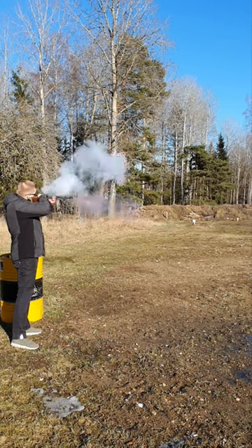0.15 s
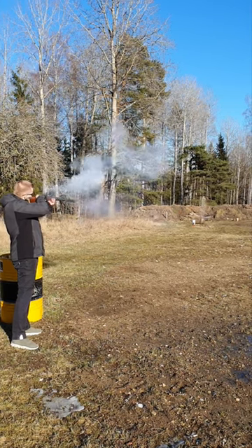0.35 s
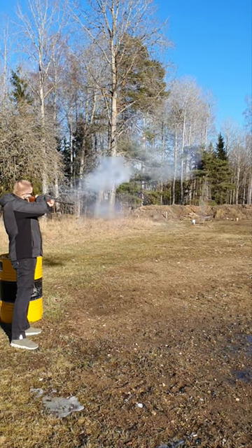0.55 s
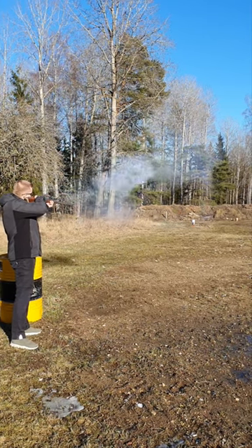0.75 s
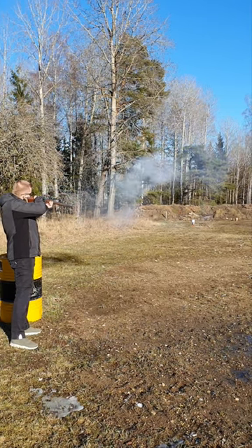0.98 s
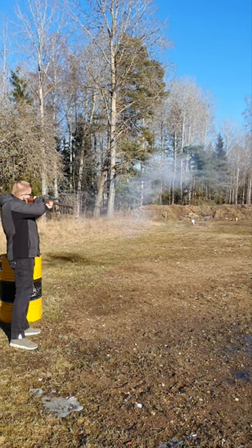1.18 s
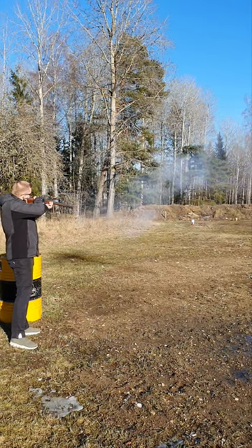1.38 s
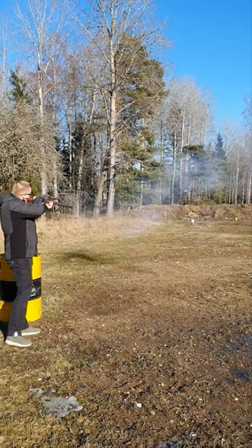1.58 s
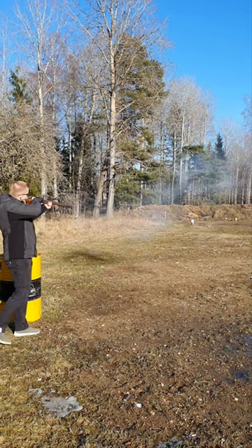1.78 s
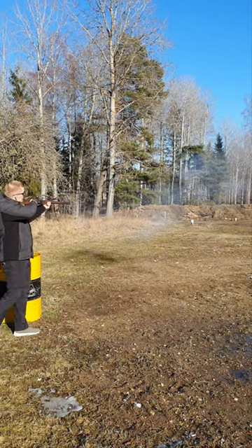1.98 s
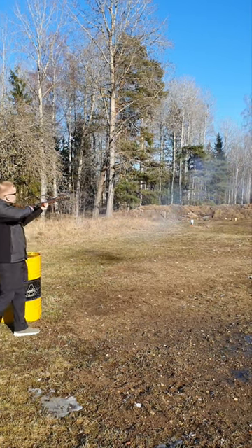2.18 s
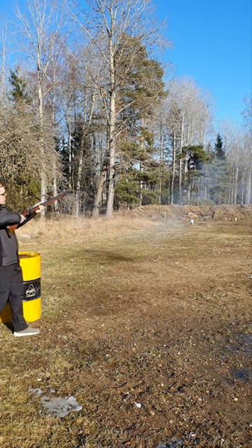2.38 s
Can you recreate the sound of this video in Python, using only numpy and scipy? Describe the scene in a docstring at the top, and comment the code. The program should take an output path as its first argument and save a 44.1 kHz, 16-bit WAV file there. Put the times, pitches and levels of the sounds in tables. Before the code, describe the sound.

A single loud rifle shot cracks across an open field, its echo rolling off nearby trees

```python
"""Flintlock rifle in an open field

A phone with two microphone ports stands a few metres from the rifle. Priming powder sputters in the pan as
coloured crackle; the muzzle blast is a burst of shaped noise over decaying low sines. Sharp slaps from nearby
ground and banks are damped pressure jumps, and the forest scatters a dulling tail of dense, filtered clicks.
A lone click and faint metal ticks follow. Wind buffets the ports as low noise, puffs and short whistles;
a faint hiss lies under all."""
import sys
import numpy as np
from scipy import signal
from scipy.fft import rfft, irfft
from scipy.io import wavfile
from scipy.ndimage import uniform_filter1d

SR = 44100
rng = np.random.default_rng(int(sys.argv[2]) if len(sys.argv) > 2 else 0)


def output_pcm(signal):
    """Save a mono or channel-first signal as 16-bit PCM at the path in sys.argv[1].

    Samples are clipped to [-1, 1] before scaling.
    """
    pcm = np.clip(np.atleast_2d(signal).T, -1, 1) * 32767
    wavfile.write(sys.argv[1], SR, np.round(pcm).astype(np.int16))


def convert_level_to_amplitude(level_db):
    """Map a level in decibels to its linear amplitude factor."""
    exponent = np.asarray(level_db, float) / 20
    return 10 ** exponent


N = 108045  # samples, 2.45 s


def on_time(rows):
    """Curve of (s, value) rows per sample."""
    a = np.array(rows, float)
    return np.interp(np.arange(N) / SR, a[:, 0], a[:, 1])


def on_hz(rows, hz):
    """Table of (Hz, value) rows read on a log frequency axis."""
    a = np.array(rows, float)
    return np.interp(np.log(np.maximum(hz, 1)), np.log(a[:, 0]), a[:, 1])


def unit(x):
    """Scale to rms 1."""
    return x / np.sqrt(np.mean(x ** 2))


def coloured(x, colour):
    """Filter x by a colour table, then scale to rms 1."""
    hz = np.arange(N // 2 + 1) * SR / N
    return unit(irfft(rfft(x) * convert_level_to_amplitude(on_hz(colour, hz)), N))


def walk(rate):
    """Slow random wander with about rate new values per second, spread 1."""
    hold = int(SR / rate)
    steps = np.repeat(rng.standard_normal(N // hold + 1), hold)
    w = uniform_filter1d(steps, hold)[:N]
    return w / w.std()


def band(x, hz, width_hz):
    """Two-pole resonance."""
    return signal.lfilter(*signal.iirpeak(hz, hz / width_hz, fs=SR), x)


def add(out, x, at_s):
    """Mix x into out from at_s."""
    i = int(at_s * SR)
    n = min(x.shape[-1], N - i)
    out[..., i:i + n] += x[..., :n]


def crackle(per_s, spread_db):
    """Random clicks of either sign and uneven size, per_s of them a second on average."""
    chance, side, size = rng.random((3, N))
    heights = convert_level_to_amplitude(-spread_db * np.log(size + 1e-9))
    return (chance < per_s / SR) * np.sign(side - .5) * heights


# How alike the two ports hear a sound: f/Hz, likeness (0-1)
PORT_LIKENESS = [(60, 1), (300, 1), (700, .9), (1400, 0.25), (3000, 0.26), (6000, 0.61), (15000, 0.61)]
# Left port against right: f/Hz, level difference/dB
PORT_BALANCE = [(60, 1.5), (110, -2), (200, 2), (380, -1), (700, -1), (1290, -2), (2380, -2), (4400, -6),
                (8120, -3.5), (15000, -1.5)]
# Phase by which the left port leads the right: f/Hz, lead/rad
PORT_LEAD = [(60, 0.7), (300, 0.8), (700, -1.48), (1400, 0.76), (4000, -0.94), (8000, -2), (15000, -1)]


def ports(common, apart):
    """Two ports hear the same sound with a lead and a balance, plus an unrelated share."""
    hz = np.arange(N // 2 + 1) * SR / N
    like = np.clip(on_hz(PORT_LIKENESS, hz), 0, 1)
    half = convert_level_to_amplitude(on_hz(PORT_BALANCE, hz) / 2) * np.exp(.5j * on_hz(PORT_LEAD, hz))
    shared = np.sqrt((1 + like) / 2) * rfft(common)
    unshared = np.sqrt((1 - like) / 2) * rfft(apart)
    return irfft(np.array([(shared + unshared) * half, (shared - unshared) / half]), N)


# Muzzle gas roar ahead of the ports: t/s, level/dB
ROAR_LEVEL = [(.199, -72.5), (.203, -35), (.2065, -26), (.2085, -9.5), (.2105, -13.5), (.2115, -20),
              (.2135, -20.5), (.217, -21.5), (.224, -24.5), (.24, -33), (.27, -36.5), (.30, -55.5)]
# Spectrum of the roar: f/Hz, relative level per Hz/dB
ROAR_SPECTRUM = [(180, -29), (300, 4.5), (1280, -23.5), (2030, -11.5), (3640, -13.5), (4160, -13.5),
                 (6850, -23), (7690, -36), (8360, -15), (11100, -16.5), (16000, -37.5)]
# Thump of the blast: start t/s, f/Hz, level/dB, t60/s, first swing (+1 push, -1 pull)
THUMP_RINGS = [(0.2069, 77, -13, .11, -1), (0.21, 200, -9, .025, 1), (.2255, 310, -23, 0.064, 1),
               (.217, 130, -22, 0.053, -1)]


def blast():
    """Hot gas roars out of the muzzle as shaped noise over a low thump of decaying sines."""
    level = convert_level_to_amplitude(on_time([(.198, -120), *ROAR_LEVEL, (.33, -120)]))
    common, apart = [coloured(rng.standard_normal(N), ROAR_SPECTRUM) * level for _ in range(2)]
    out = ports(common, apart)
    t = np.arange(SR // 2) / SR
    left_right = convert_level_to_amplitude(np.array([[1.2], [-1.2]]))  # thump sits slightly left
    for at, hz, db, t60, sign in THUMP_RINGS:
        onset = 1 - np.exp(-t / .0015)
        ring = np.sign(sign) * np.sin(2 * np.pi * hz * t) * onset * 1000. ** (-t / t60)
        add(out, convert_level_to_amplitude(db) * ring * left_right, at)
    return out


# Slaps from single surfaces, ahead of the ports and their colour:
# t/s, peak level/dB, ring f/Hz, treble edge f/Hz, smear level against the peak/dB, bass level/dB
SURFACE_SLAPS = [(.2174, -3.5, 1200, 14000, -18, -39.5), (.220, -3.5, 1200, 8000, -16, -40.5),
                 (0.2575, -1, 1050, 14000, -15, -45.5), (.318, -20.5, 593, 3000, -3.5, -38),
                 (.329, -17.5, 685, 4000, -5, -31.5), (.357, -25.5, 906.4, 4006, -10, -40),
                 (.402, -22.5, 570, 5000, -3, -30.5), (.450, -24, 1300, 4006, -10.5, -49.5),
                 (.467, -33.5, 500.9, 1500, -2.5, -37.5), (.496, -18.5, 556, 995, -0.5, -54.5),
                 (.478, -29, 600.5, 1201, -2, -55), (0.514, -29, 550.8, 1202, 0.5, -54.5),
                 (.527, -21, 315, 900, -3, -26), (.588, -34, 1210, 4000, -12.5, -48.5),
                 (.601, -29.5, 390, 2970, -3, -37), (.665, -31.5, 665, 2500, -7.5, -55.5),
                 (.773, -40, 900, 2496, -2.5, -55.5), (1.47, -52.5, 600, 1200, 1, -69),
                 (1.755, -43, 550, 1100, -5, -57.5)]
SLAP_DAMPING = 2.5  # decay per ring cycle, in nepers
SCATTER_S, BASS_HZ, BASS_T60_S = .004, 105, .057
# Phone microphone colour on the slaps; the bump is a resonance added at this level
NOTCH_HZ, NOTCH_WIDTH_HZ = 7600, 2500
BUMP_HZ, BUMP_WIDTH_HZ, BUMP_DB = 10000, 2500, .5


def slaps():
    """Each surface sends back the pressure jump with its suction, a short smear and some of the thump."""
    out, t = np.zeros((2, N)), np.arange(SR // 8) / SR
    bass = np.sin(2 * np.pi * BASS_HZ * t) * 1000. ** (-t / BASS_T60_S)
    to_common = np.array([[1], [0]])
    for at, db, hz, top_hz, smear_db, bass_db in SURFACE_SLAPS:
        soft = signal.butter(3, min(top_hz, 19000), fs=SR, output="sos")
        jump = signal.sosfilt(soft, np.cos(2 * np.pi * hz * t) * np.exp(-SLAP_DAMPING * hz * t))
        jump = jump / jump.max()
        grit = rng.standard_normal((2, len(t))) * np.exp(-t / SCATTER_S)
        smear = signal.fftconvolve(grit, jump[None, :800])[:, :len(t)] / np.sqrt(np.sum(jump ** 2))
        direct = convert_level_to_amplitude(db) * jump + convert_level_to_amplitude(bass_db) * bass
        add(out, convert_level_to_amplitude(db + smear_db) * smear + direct * to_common, at)
    notch = band(out, NOTCH_HZ, NOTCH_WIDTH_HZ)
    out = out - notch
    out = out + convert_level_to_amplitude(BUMP_DB) * band(out + notch, BUMP_HZ, BUMP_WIDTH_HZ)
    return ports(*out)


# Forest tail around 600 Hz, ahead of the overall lift: t/s, level/dB
FOREST_LEVEL = [(.215, -53), (0.239, -35), (.29, -36.5), (.34, -39), (.385, -42.5), (.44, -46), (.5, -42),
                (.545, -44), (.575, -45), (.66, -47.5), (.78, -52), (.85, -56), (.95, -52), (1.12, -58),
                (1.321, -64.5), (1.5, -60.5), (1.83, -64), (1.97, -69.5), (2.45, -73.5)]
# Spectrum of the tail before its treble and path losses: f/Hz, relative level per Hz/dB
FOREST_SPECTRUM = [(24, -41.5), (40, -10.5), (297, -5.5), (542, -6.5), (615, -8.5), (680, -7),
                   (2260, -21.5), (3380, -23.5), (6020, -37.5), (9690, -27.5), (16000, -44)]
# Extra loss on the longer paths, negative for a gain: f/Hz, loss rate/(dB per s)
PATH_LOSS = [(60, 11.5), (200, 16), (600, -2.5), (1500, 2), (3000, 18), (5000, 28.5), (9000, 35),
             (15000, 53)]
# Treble of the tail against its middle: t/s, level/dB
TAIL_TREBLE = [(.22, 4), (.29, -0.5), (.38, 2.5), (.44, 3), (.49, -4.5), (.545, -2.5), (.58, 1.5), (.75, 3),
               (.85, 3), (1.1, 3), (1.3, 1.5), (1.5, -3.5), (2.45, -4.5)]
TREBLE_HZ = 1500  # the treble curve acts in full from here up
TRUNKS_PER_S, TRUNK_SPREAD_DB = 7000, 1.5
FOREST_FLICKER_DB, FOREST_LIFT_DB = 1.9, 5.5


def forest():
    """Echoes from countless trunks; later ones travelled further and lost more treble."""
    hz, t = np.arange(N // 2 + 1) * SR / N, np.arange(N) / SR
    echoes = [coloured(crackle(TRUNKS_PER_S, TRUNK_SPREAD_DB), FOREST_SPECTRUM) for _ in range(2)]
    spectrum, out = rfft(ports(*echoes)), 0
    half_octaves = 2 * np.log2(np.maximum(hz, 1) / 40)
    for k in range(19):  # overlapping half-octave bands from 40 Hz up
        share = np.cos(np.pi / 2 * np.clip(half_octaves - k, -1, 1)) ** 2
        mid_hz = 40 * 2 ** (k / 2)
        treble_db = min(mid_hz / TREBLE_HZ, 1) ** 2 * on_time(TAIL_TREBLE)
        loss_db = on_hz(PATH_LOSS, mid_hz) * (t - .3)
        db = treble_db - loss_db + FOREST_FLICKER_DB * walk(25)
        out = out + irfft(spectrum * share, N) * convert_level_to_amplitude(db)
    return out * convert_level_to_amplitude(FOREST_LIFT_DB + on_time([(.205, -120), *FOREST_LEVEL]))


# Priming powder in the pan, ahead of the ports: t/s, level/dB
PAN_LEVEL = [(0, -66), (.004, -49), (.016, -35), (.024, -51.5), (.032, -43), (.04, -50), (.053, -45),
             (.064, -54.5), (.075, -52), (.085, -60.5), (.11, -63), (.185, -75)]
# Spectrum of the fizz: f/Hz, relative level per Hz/dB
PAN_SPECTRUM = [(88, -61), (150, -35.5), (275, -8.5), (601, -3.5), (821, -6.5), (1080, -5), (1720, -4),
                (7320, -23), (8900, -10), (16000, -29.5)]


def pan_fizz():
    """Burning grains sputter in the pan as thousands of tiny clicks a second."""
    level = convert_level_to_amplitude(on_time([*PAN_LEVEL, (.2, -99)]))
    common, apart = [coloured(crackle(6000, 2.5), PAN_SPECTRUM) * level for _ in range(2)]
    return ports(common, apart)


# A lone bright click, perhaps the ball striking far off
CLICK_S, CLICK_DB, CLICK_LOW_EDGE_HZ = .4668, -25, 1800


def click():
    """A single impulse with a very short noisy decay, its lows cut, alike on both ports."""
    out, t = np.zeros(N), np.arange(SR // 20) / SR
    snap = (t == 0) + .3 * rng.standard_normal(len(t)) * np.exp(-t / .0008)
    bright = signal.butter(2, CLICK_LOW_EDGE_HZ, "high", fs=SR, output="sos")
    add(out, convert_level_to_amplitude(CLICK_DB) * signal.sosfilt(bright, snap), CLICK_S)
    return out


# Faint metal ticks: t/s, level/dB, f/Hz
METAL_TICKS = [(2.04, -75, 4200), (2.042, -74, 3100), (2.083, -75, 3113), (2.19, -81, 3500),
               (2.335, -78, 1500)]


def ticks():
    """Small gritty metal ticks as the rifle is lowered: a short ring and shorter noise."""
    out, t = np.zeros(N), np.arange(SR // 20) / SR
    for at, db, hz in METAL_TICKS:
        ring = np.sin(2 * np.pi * hz * t) * np.exp(-t / .006)
        grit = unit(band(rng.standard_normal(len(t)), hz, 2500)) * np.exp(-t / .003)
        add(out, convert_level_to_amplitude(db) * (ring + .6 * grit), at)
    return out


def rumble(n, hz, width_hz):
    """Noise through three equal resonances, rms 1."""
    x = rng.standard_normal(n)
    for _ in range(3):
        x = band(x, hz, width_hz)
    return unit(x)


# Wind flutter on the left port: t/s, level/dB
FLUTTER_LEVEL = [(0, -69), (.1, -53.5), (.17, -58.5), (.7, -56), (.8, -49), (.92, -58), (1.02, -68),
                 (1.15, -63), (1.3, -70.5), (1.4, -60), (1.6, -52.5), (1.97, -57), (2.2, -52.5),
                 (2.45, -50)]
FLUTTER_HZ, FLUTTER_WIDTH_HZ, FLUTTER_SWING_DB = 75, 49, 4.5
# Wind puffs: centre t/s, length/s, left level/dB, right level/dB, f/Hz
WIND_PUFFS = [(0.961, .04, -48.5, -48, 70), (1.43, .05, -48, -46, 55), (1.495, .03, -37.5, -42, 90.2),
              (1.549, .04, -40.5, -41.5, 101), (1.606, .02, -44.5, -51, 100),
              (1.653, .02, -37.5, -39.5, 152), (1.69, 0.055, -48, -37.5, 99.4),
              (1.745, .04, -34.5, -34.5, 70), (1.789, 0.042, -40.5, -74, 75), (1.87, 0.051, -41.5, -50, 85),
              (1.94, .035, -37.5, -37.5, 80.7), (1.997, .03, -40.5, -51, 54.4),
              (2.06, 0.075, -38.5, -73, 85.4), (2.142, 0.046, -31, -40, 70.2), (2.167, .04, -40, -70, 75),
              (2.229, .06, -36.5, -52, 75), (2.29, .04, -38.5, -36.5, 75), (2.33, .03, -36, -40, 79),
              (2.37, 0.045, -41, -46.5, 90), (2.44, 0.044, -39, -45.5, 60)]
PUSH, EDGE_DB = .4, -10  # steady pressure and rough noise in a puff, against its swing
PUFF_NARROWING = (2, 3.1)  # left, right: puffs pass the right port faster
# Brief whistles of air at the right port: centre t/s, level/dB, f/Hz
AIR_WHISTLES = [(1.609, -55.5, 390), (1.651, -62, 350), (1.691, -51, 330), (1.764, -46.5, 432),
                (2.076, -51.5, 380), (2.142, -52.5, 372), (2.185, -50, 396.4), (2.385, -55.5, 451)]
WHISTLE_S = .017


def wind():
    """A low flutter on the left port, puffs that swing either membrane, brief whistles on the right."""
    out = np.zeros((2, N))
    flutter_db = on_time(FLUTTER_LEVEL) + FLUTTER_SWING_DB * walk(18)
    out[0] = rumble(N, FLUTTER_HZ, FLUTTER_WIDTH_HZ) * convert_level_to_amplitude(flutter_db)
    for at, length, left_db, right_db, hz in WIND_PUFFS:
        t = np.arange(-2 * length, 2 * length, 1 / SR)
        for port, db in enumerate((left_db, right_db)):
            edge = convert_level_to_amplitude(EDGE_DB) * rumble(SR // 2, 1.4 * hz, 2.2 * hz)[-len(t):]
            swing = PUSH + np.sin(2 * np.pi * (hz * t + rng.random())) + edge
            swell = np.exp(-(t / length * PUFF_NARROWING[port]) ** 2)
            add(out[port], convert_level_to_amplitude(db) * swing * swell, at - 2 * length)
    t = np.arange(-2 * WHISTLE_S, 2 * WHISTLE_S, 1 / SR)
    swell = np.exp(-(t / WHISTLE_S * 2) ** 2)
    for at, db, hz in AIR_WHISTLES:
        tone = rumble(SR // 2, hz, 260)[-len(t):]
        add(out[1], convert_level_to_amplitude(db) * tone * swell, at - 2 * WHISTLE_S)
    return out


# Spectrum of the hiss: f/Hz, relative level per Hz/dB
HISS_SPECTRUM = [(120, -25.5), (300, 1.5), (600, -9), (1200, -20), (3400, -23.5), (7300, -34.5),
                 (11000, -30), (15000, -32), (16500, -42.5)]
# The hiss sinks just after the blast and creeps back
HISS_DB, SINK_AT_S, SINK_DB, RETURN_DB_PER_S = -64.5, .26, 29.5, 11


def hiss():
    """Faint coloured noise, unrelated on the two ports."""
    t = np.arange(N) / SR
    sunk_db = np.where(t > SINK_AT_S, SINK_DB - RETURN_DB_PER_S * (t - SINK_AT_S), 0)
    noise = np.array([coloured(rng.standard_normal(N), HISS_SPECTRUM) for _ in range(2)])
    return noise * convert_level_to_amplitude(HISS_DB - sunk_db)


def scene():
    """All sources at the two ports."""
    return blast() + slaps() + forest() + pan_fizz() + click() + ticks() + wind() + hiss()


def top_cut(x):
    """Nothing passes above the cut-off."""
    return signal.sosfilt(signal.butter(12, 16660, fs=SR, output="sos"), x)


def record(dry):
    """The phone's ports take a narrow dip near 8 kHz out of the mix."""
    mix = dry - .51 * band(dry, 7640, 900)
    return top_cut(mix)


dry = scene()
out = record(dry)
output_pcm(out)
```